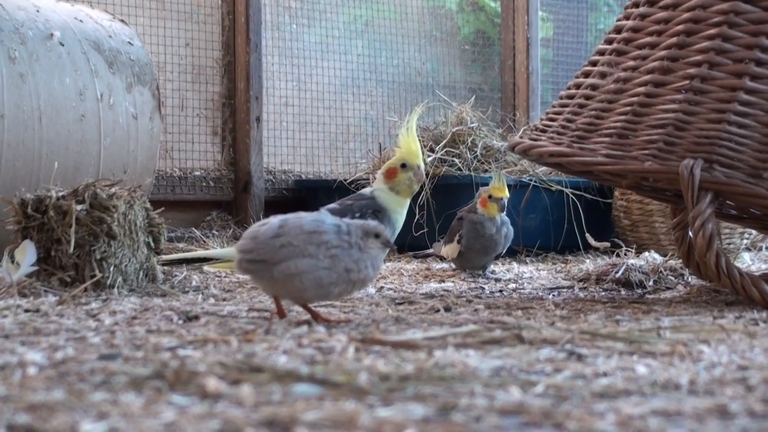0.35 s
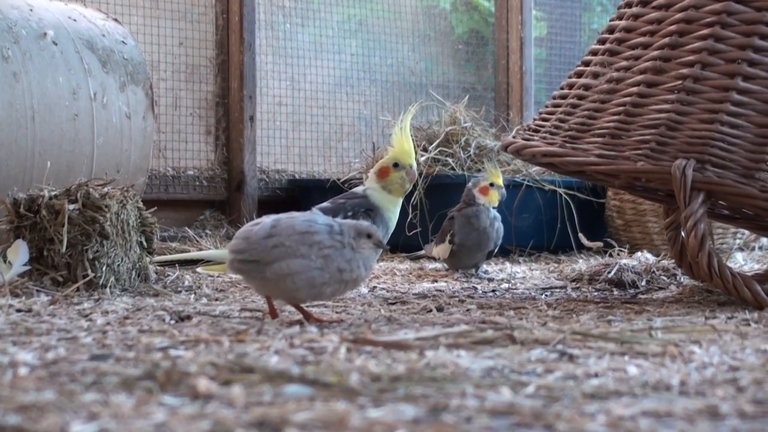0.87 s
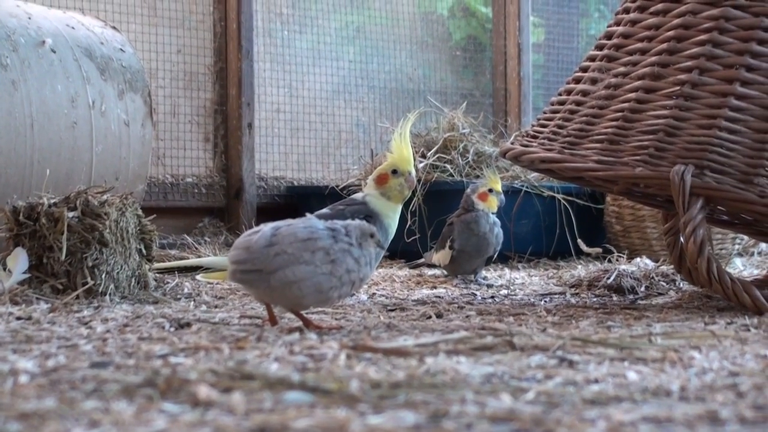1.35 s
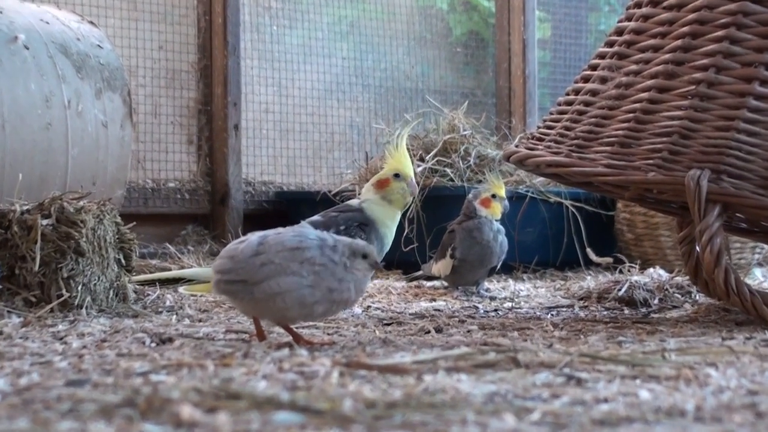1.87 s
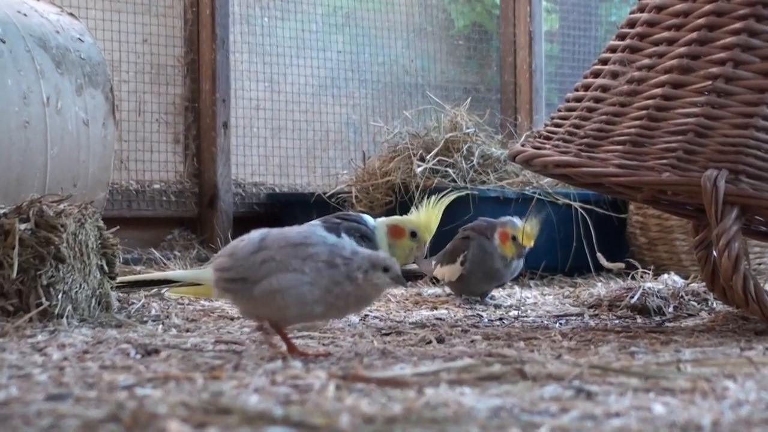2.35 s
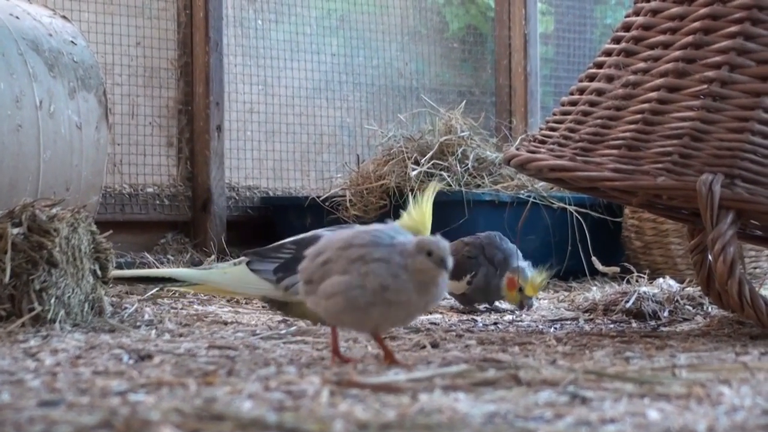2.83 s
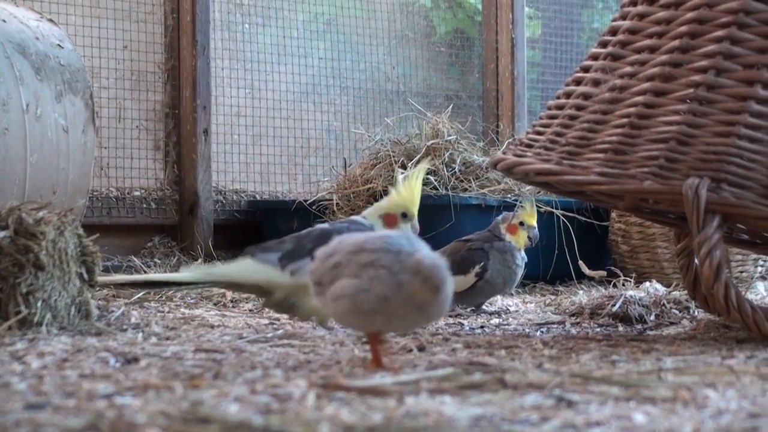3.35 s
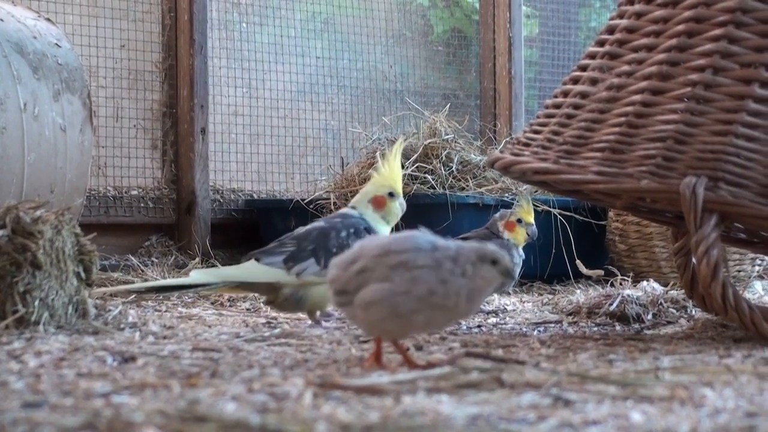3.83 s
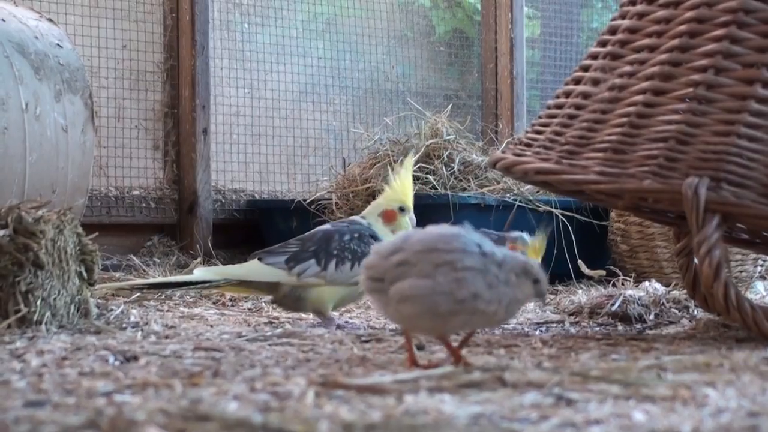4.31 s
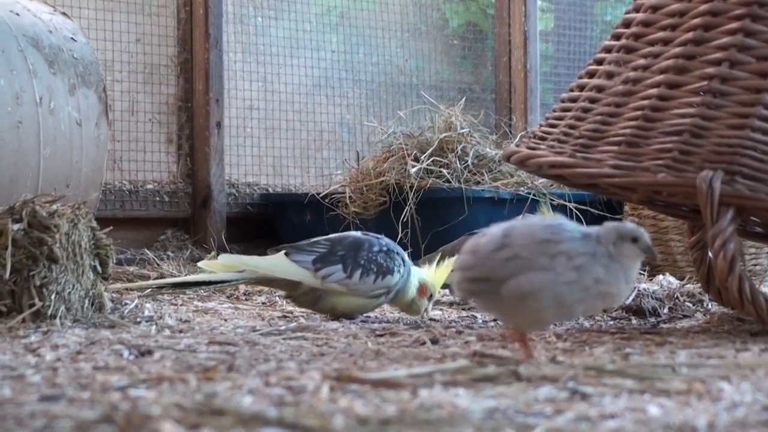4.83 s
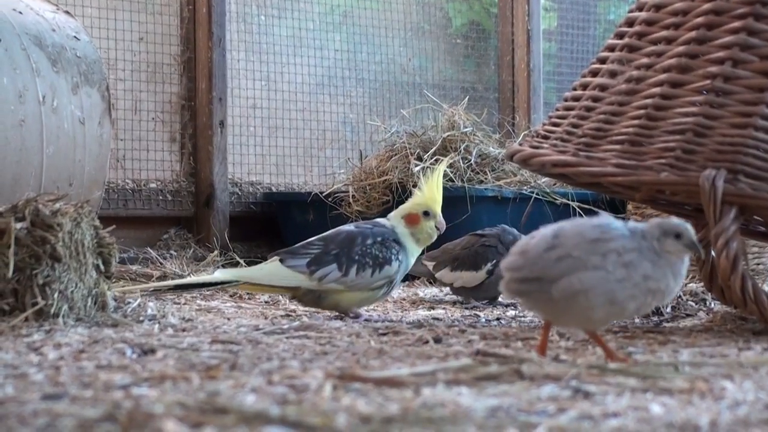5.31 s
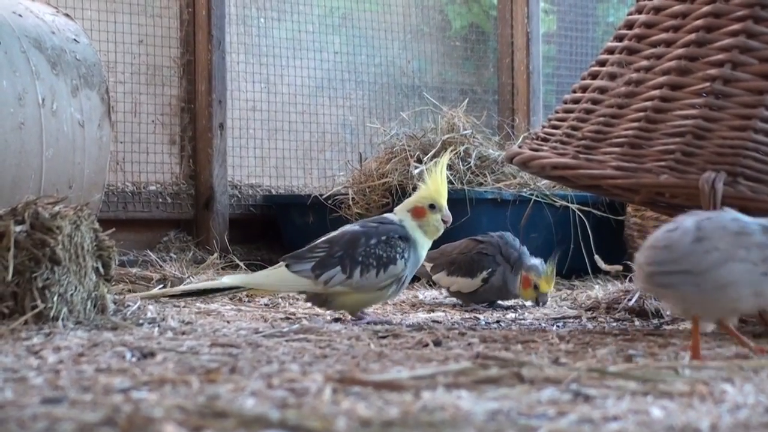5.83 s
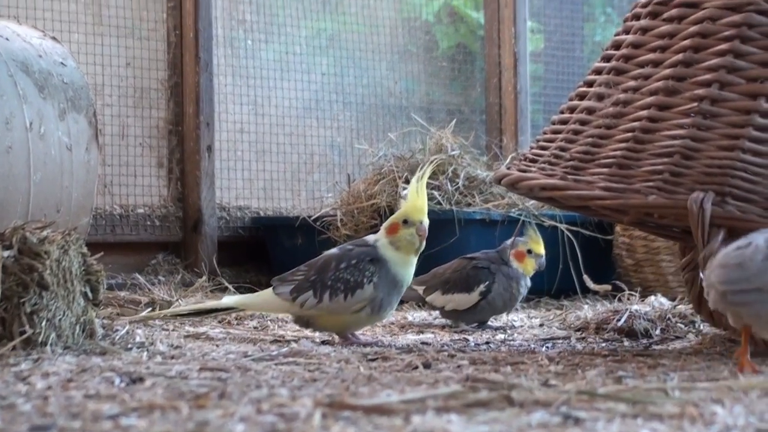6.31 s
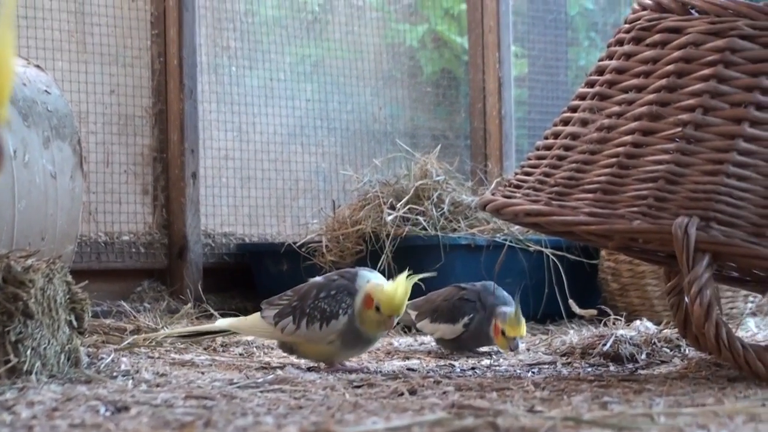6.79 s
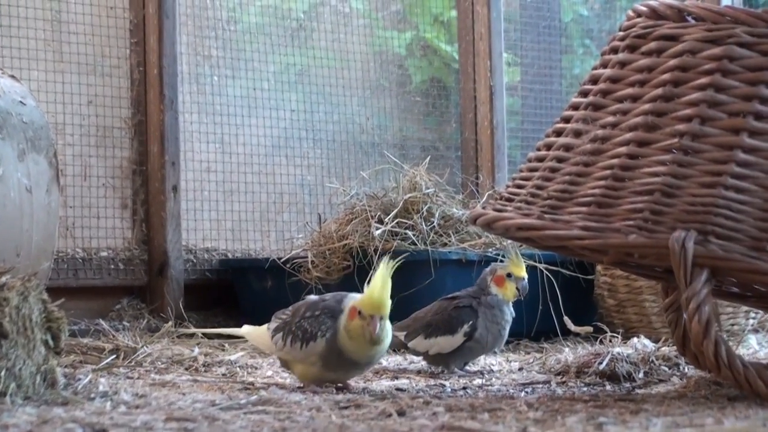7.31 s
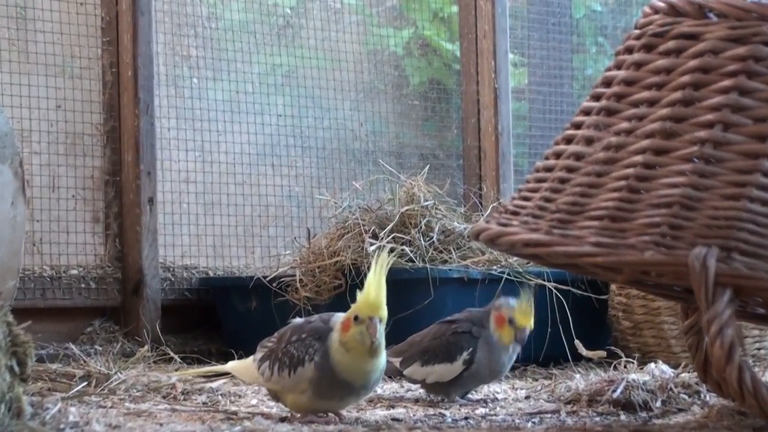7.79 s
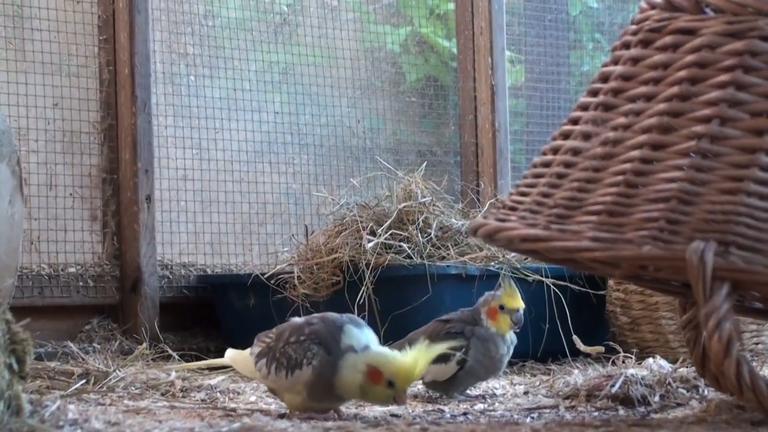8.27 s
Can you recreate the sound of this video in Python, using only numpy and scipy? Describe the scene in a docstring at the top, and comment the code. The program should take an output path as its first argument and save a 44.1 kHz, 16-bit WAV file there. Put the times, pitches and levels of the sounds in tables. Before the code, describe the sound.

Short high bird calls and harsh rasps come in quick bouts among crisp litter ticks, with faint traffic rumble, motor drone and airy hiss.

```python
"""Small parrots chatter in a timber-and-mesh aviary: whistled notes, hoarse squawks and harsh rasps.
Beaks and feet tick in the seed litter close by; distant traffic rumbles, a motor drones and air hisses.
Tonal calls are gliding harmonic stacks under a throat resonance; rasps are erratic pulses with breath noise.
Ticks are crackles ringing in husk modes; calls and ticks excite a diffuse tail. Rumble and hiss are banded
noise, and the motor is a wavering sine."""
import sys
import numpy as np
from scipy import signal
from scipy.fft import rfft, irfft
from scipy.io import wavfile

SR = 44100
rng = np.random.default_rng(int(sys.argv[2]) if len(sys.argv) > 2 else 0)


def unload_wav(signal):
    """Save mono or channel-first audio to the path in sys.argv[1] as 16-bit WAV at rate SR, clipped to [-1, 1]."""
    wavfile.write(
        sys.argv[1],
        SR,
        np.round(np.clip(np.atleast_2d(signal).T, -1, 1) * 32767).astype(np.int16),
    )


def rack_gain(trim_db):
    """Turn a fader trim in dB into the linear factor to multiply a signal by."""
    fader = np.asarray(trim_db, float)
    return 10 ** (fader / 20)


N = 370881   # samples

# transmission of throat and beak, common to every call: frequency_hz, gain_db
HEAD_GAIN = [(800, 3), (1300, 4), (4000, 1.5), (6000, 0), (7400, -2.5), (9500, -7), (11500, -6.5),
             (13000, -18), (16000, -49)]


def clear_calls():
    """Near-periodic membrane vibration: whistles, nasal notes, a long cry and caws."""
    # short clear notes, the throat tuned to the pitch: start_s, length_s, level_db, start_hz, end_hz
    whistles = [(0.355, 0.022, -29.5, 3550, 4010), (0.425, 0.025, -37, 3360, 3330),
                (0.5, 0.08, -45, 2405, 2310), (0.835, 0.028, -32, 4580, 2430),
                (1.69, 0.033, -51, 1545, 2720), (2.19, 0.02, -37.5, 1970, 1800),
                (2.207, 0.011, -19, 2880, 2840), (2.655, .012, -30, 3720, 3810),
                (2.685, 0.027, -36.5, 2080, 2350), (2.765, 0.016, -25.5, 1914, 1790),
                (4.06, 0.024, -29, 3900, 4520), (4.072, 0.04, -32, 2840, 2660),
                (4.088, 0.053, -25.5, 3580, 3530), (4.115, 0.031, -31, 2580, 2060),
                (4.16, 0.023, -33, 2280, 2090), (4.165, 0.049, -24.5, 3178, 3135),
                (4.198, 0.024, -35.5, 2020, 1690), (4.35, 0.052, -50, 3870, 3800),
                (4.72, 0.032, -50, 2500, 2250), (5.578, 0.011, -31.5, 2890, 2790),
                (7.132, 0.037, -26, 3414, 3480), (7.887, 0.033, -30, 3310, 3390),
                (7.918, 0.035, -28, 7240, 7200), (7.955, 0.026, -19, 4710, 4724)]
    # low nasal notes, the throat on a high overtone: start_s, length_s, level_db, top_pitch_hz, throat_hz
    nasal = [(1.03, 0.034, -43, 1915, 5800), (3.98, 0.033, -54, 1105, 2180), (5.091, 0.019, -39, 836, 3220),
             (5.513, 0.022, -29, 1908, 3450), (7.375, 0.057, -22.5, 1643, 4800),
             (7.41, 0.048, -29, 1194, 3640), (7.47, 0.1085, -32.5, 896.4, 4350),
             (8.12, 0.068, -22.5, 1624, 4780), (8.16, 0.043, -29.5, 1185, 4700),
             (8.235, 0.091, -31.5, 887, 4900), (8.381, 0.026, -21.5, 1814, 3750)]
    # the long clear cry: time_s, pitch_hz, level_db, overtone_fall_db_per_octave
    cry = [(5.99, 2826, -30, 25), (6.015, 3293, -50, 5), (6.04, 3810, -19, 9), (6.068, 4000, -37, 7),
           (6.078, 4256, -17, 6), (6.09, 4780, -26, 9), (6.098, 4260, -25, -1), (6.108, 3070, -15.5, 22),
           (6.122, 2823, -17.5, 3.5), (6.145, 2705, -17, 15), (6.172, 2770, -48, 12)]
    # caws whose pitch arches widely: start_s, length_s, level_db, top_pitch_hz, throat_hz
    caws = [(6.45, .095, -33, 903, 3920), (6.652, .105, -34, 901, 3550)]
    calls = notes(whistles) + [tuned(cry)]
    calls += arches(nasal, sag=.0295, fade_db=13, fall_db=26.5)
    calls += arches(caws, sag=.0786, fade_db=-.5, fall_db=20.5)   # past its top a caw holds its level
    return voice(calls, wobble=.012, wobble_hz=120, flutter_db=1.8, breathy=.3, below_db=10, edge_s=.004)


def hoarse_calls():
    """Irregular membrane vibration: stronger random frequency and amplitude modulation makes hoarseness."""
    # short hoarse notes with an unsteady pitch: start_s, length_s, level_db, start_hz, end_hz
    squawks = [(0.395, 0.031, -38, 1810, 2060), (0.46, 0.038, -40.5, 1760, 1840),
               (0.862, 0.022, -44, 2340, 2370), (1.42, 0.069, -53, 3860, 3900),
               (2.168, 0.031, -37.5, 2720, 3940), (2.295, 0.033, -29, 2610, 2282),
               (2.315, 0.028, -37, 1880, 2180), (2.72, 0.071, -30, 2590, 2340),
               (3.62, 0.083, -48.5, 1070, 1146), (3.89, 0.039, -46, 1068, 1076),
               (4.54, 0.051, -46.5, 4160, 4010), (7.2, 0.038, -24, 4590, 4470),
               (7.22, 0.029, -24.5, 6500, 6260), (7.975, .025, -24.5, 6000, 7040)]
    # hoarse nasal honks: start_s, length_s, level_db, top_pitch_hz, throat_hz
    honks = [(2.22, 0.072, -34.5, 1609, 3300), (6.09, 0.076, -33.5, 1818, 3600),
             (6.15, 0.068, -30, 1442, 2690)]
    # long hoarse cries, one curve each: time_s, pitch_hz, level_db, overtone_fall_db_per_octave
    cries = [
        [(0.422, 3190, -31, 30), (0.44, 2300, -33, 8), (0.47, 2350, -28, 19), (0.5, 2270, -67, 19)],
        [(3.21, 1312, -29, 9), (3.24, 1381, -34.5, 6), (3.27, 1420, -30.5, 16), (3.31, 1336, -34, 9),
         (3.33, 1280, -58, 9)],
        [(3.719, 1390, -31, 4), (3.73, 1364, -30, 7.5), (3.762, 1388, -25, 6), (3.785, 1534, -28.5, 6),
         (3.8, 1833, -22.5, 12), (3.82, 2090, -31, 13), (3.838, 2210, -24, 20)],
    ]
    calls = notes(squawks) + chirps() + [tuned(cry) for cry in cries]
    calls += arches(honks, sag=.0295, fade_db=13, fall_db=57)
    return voice(calls, wobble=.04, wobble_hz=180, flutter_db=2.5, breathy=.6, below_db=6, edge_s=.004)


def tuned(points):
    """Resonance tracking: the throat follows the pitch, so the fundamental is favoured."""
    return [(s, hz, db, hz, fall_db) for s, hz, db, fall_db in points]


def notes(rows):
    """Linear glide and decay in dB; overtones fall more steeply at high pitch, so high notes are purer."""
    fade_db = 5.5   # lost from start to end
    calls = []
    for s, length, db, *ends_hz in rows:
        points = []
        for share, hz in enumerate(ends_hz):   # share of the length: 0, then 1
            fall_db = 13.5 + 7 * np.log2(hz / 2000)
            points.append((s + share * length, hz, db - share * fade_db, fall_db))
        calls.append(tuned(points))
    return calls


def arches(rows, sag, fade_db, fall_db):
    """Parabolic arch of pitch under a still throat resonance; level changes by a parabola on each side."""
    top, swell_db = .36, 4   # share of the length at the top; level gained before it
    off = np.arange(-2, 3) / 2   # distance from the top, -1 at the start and 1 at the end
    share = top + off * np.where(off < 0, top, 1 - top)
    lost_db = off ** 2 * np.where(off < 0, swell_db, fade_db)
    return [np.c_[s + share * length, hz * (1 - sag * off ** 2), db - lost_db,
                  throat_hz + 0 * off, fall_db + 0 * off]
            for s, length, db, hz, throat_hz in rows]


def chirps():
    """Pitch scaling: one chirp contour, a flick up and a sag, is transposed to each chatter pitch."""
    # quick chatter chirps: start_s, top_pitch_hz, level_db
    chatter = [(5.655, 2026, -33), (5.742, 1920, -36.5), (5.813, 1870, -32.5), (5.911, 1762, -30),
               (6.268, 1752, -31.5), (6.352, 1948, -30)]
    # shape of one chirp: after_start_s, share_of_top_pitch, relative_level_db, overtone_under_throat,
    # overtone_fall_db_per_octave
    contour = [(0, 0.7, -0.5, 2, 15), (.014, 0.96, -10.5, 1.8, 15), (.024, 1, -3.5, 1, 17),
               (.05, .93, -20, 0.62, 15)]
    return [[(s + after, hz * share, db + rise_db, hz * share * overtone, fall_db)
             for after, share, rise_db, overtone, fall_db in contour] for s, hz, db in chatter]


def voice(calls, wobble, wobble_hz, flutter_db, breathy, below_db, edge_s):
    """Source and filter: a gliding harmonic stack falls away on both sides of the throat resonance."""
    out, shaky, flutter = np.zeros(N), drift(wobble_hz), drift(160)
    turbulence = drift(500)   # air rushing past the membranes
    for call in calls:
        s, *columns = np.transpose(call)
        at = np.arange(round(s[0] * SR), min(round(s[-1] * SR), N))
        hz, db, throat_hz, fall_db = (np.interp(at / SR, s, c) for c in columns)
        k = np.arange(1, 15000 // hz.min() + 1)[:, None]   # overtone number
        octaves = np.log2(k * hz / throat_hz)
        slope_db = np.where(octaves > 0, -fall_db * octaves, below_db * octaves)
        head_db = at_hz(HEAD_GAIN, k * hz) - at_hz(HEAD_GAIN, throat_hz)
        strength = rack_gain(slope_db + head_db) * (k * hz < .4 * SR)
        # higher overtones are breathier
        strength = strength * (1 + breathy * np.clip(k * hz / 3000 - .4, 0, 1.2) * turbulence[at])
        wobble_share = np.minimum(hz / 2500, 2500 / hz)   # the lowest and highest notes wobble least
        turns = np.cumsum(hz * (1 + wobble * wobble_share * shaky[at])) / SR
        stack = np.sum(strength * np.sin(k * 2 * np.pi * turns + k * k), axis=0)
        breath = np.clip(np.minimum(at / SR - s[0], s[-1] - at / SR) / edge_s, 0, 1)
        out[at] += rack_gain(db + flutter_db * flutter[at]) * breath * stack
    return out


def rasps(jitter, hiss, swell, fade_db):
    """Aperiodic phonation: erratic membrane pulses and breath noise, coloured by the open beak."""
    # broad harsh rasps: start_s, length_s, level_db, centre_hz, mean_pulse_rate_hz
    broad = [(0.388, 0.05, -47, 2880, 2290), (0.842, 0.03, -41.5, 3600, 1208),
             (0.901, 0.041, -43, 2500, 2255), (1.021, 0.047, -40.5, 5700, 1338),
             (1.416, 0.074, -47, 2500, 1440), (1.761, 0.032, -39, 3570, 1572),
             (2.124, .025, -52, 6270, 1885), (2.206, 0.078, -37, 3460, 1449),
             (2.307, 0.0084, -37, 3080, 2240), (2.683, 0.09, -53, 3500, 2200),
             (2.873, 0.041, -23.5, 3700, 2018), (3.143, 0.036, -22.5, 4770, 2807),
             (3.232, .091, -47.5, 6600, 1440), (3.464, 0.1, -52, 3620, 1990), (4.1, 0.075, -41, 3470, 2020),
             (5.09, 0.021, -34.5, 3820, 1564), (5.148, 0.02, -39, 3000, 1443),
             (5.229, 0.02, -37, 3540, 1462), (5.279, 0.029, -40, 3250, 1455),
             (5.365, 0.036, -29.5, 3220, 1495), (5.424, 0.025, -39, 3030, 1410),
             (5.512, 0.035, -40, 3600, 1914), (5.576, 0.022, -38, 3120, 1427),
             (5.648, 0.039, -41.5, 2940, 1462), (5.741, 0.022, -44, 3040, 1850),
             (5.902, 0.06, -40, 3000, 1756), (5.986, 0.032, -35.5, 3000, 1528),
             (6.019, 0.041, -35, 4870, 1803), (6.078, 0.095, -34.5, 3570, 1400),
             (6.271, 0.032, -37.5, 3270, 1650), (6.355, 0.028, -32, 3320, 1800),
             (6.632, 0.081, -38, 3100, 1750), (6.792, 0.032, -29, 3870, 1873),
             (6.859, 0.048, -35.5, 3620, 1930), (6.913, 0.083, -36, 3500, 1287),
             (7.026, .03, -42.5, 4650, 2060), (7.043, .044, -41, 3320, 1520),
             (7.315, .058, -20, 4950, 1474), (7.362, 0.11, -32, 4200, 1588),
             (7.665, 0.09, -35.7, 3380, 1543), (7.777, 0.094, -43, 3600, 2040),
             (7.878, 0.19, -47.5, 3530, 1720), (8.097, 0.11, -32.5, 3950, 1569),
             (8.369, 0.05, -35, 4600, 1840)]
    # thin wheezes through a nearly closed beak: start_s, length_s, level_db, centre_hz, spread_octaves
    wheezes = [(0.113, .11, -54, 2600, 0.11), (0.446, 0.031, -43, 7200, 0.065),
               (1.12, .059, -59, 9000, 0.43), (2.027, .032, -62, 6500, .35),
               (2.225, 0.031, -40, 6360, 0.022), (2.293, 0.023, -39, 7800, 0.059),
               (2.551, 0.022, -41.5, 10200, 0.28), (2.81, 0.071, -52, 7200, 0.29),
               (3.018, 0.045, -50.5, 7200, 0.11), (4.069, 0.015, -34, 4000, 0.32),
               (4.484, 0.11, -55.5, 4750, 0.34), (4.647, 0.046, -51, 7000, 0.11),
               (4.857, 0.043, -49, 7140, 0.12), (5.813, 0.031, -45.5, 2490, 0.18),
               (6.526, 0.055, -34.5, 2860, .37), (7.124, 0.14, -42.5, 3370, 0.33),
               (7.16, 0.043, -32.5, 7200, .071), (7.205, 0.042, -41, 3420, 0.42),
               (7.219, 0.019, -30, 6000, 0.073), (7.951, 0.068, -39, 3150, 0.33),
               (7.983, 0.016, -33, 6370, 0.28), (8.145, 0.11, -30.5, 4060, 0.31)]
    shaky, noise, out = drift(265), rng.standard_normal(N), np.zeros(N)
    # a rasp narrows by 0.007 octave for each dB louder
    rows = [(s, length, db, hz, .64 - .007 * (db + 40), pulse_hz) for s, length, db, hz, pulse_hz in broad]
    rows += [(*row, 1800) for row in wheezes]   # pulse rate, Hz
    for s, length, db, centre_hz, spread, pulse_hz in rows:
        at = np.arange(round(s * SR), min(round((s + 3 * length) * SR), N))   # leaves room for the fade
        turns = np.cumsum(pulse_hz * np.exp(jitter * shaky[at])) / SR
        pulses = sum(np.sin(k * 2 * np.pi * turns) for k in range(1, 8))
        source = rms_one(pulses) + hiss * noise[at]
        hz = np.fft.rfftfreq(len(at), 1 / SR) + 1
        colour = np.exp(-(np.log2(hz / centre_hz) / (2 * spread)) ** 2)
        colour = colour * rack_gain(at_hz(HEAD_GAIN, hz)) / (1 + (1100 / hz) ** 8)   # little below 1100 Hz
        t = (at - at[0]) / SR / length   # in lengths
        breath = np.clip(t / swell, 0, 1) * rack_gain(-fade_db * np.maximum(t - .6, 0))
        out[at] += rack_gain(db) * breath * rms_one(irfft(rfft(source) * colour, len(at)))
    return out


def ticks(faint_per_s, faint_db, t60):
    """Modal excitation: a decaying crackle rings husk resonances; fainter ticks fall at random."""
    # seeds cracked and litter stepped on: start_s, peak_db, dullness_db_per_octave
    strikes = [(0.0149, -41, -17), (0.157, -36, 1), (0.2018, -31.5, 9), (0.2455, -39.5, -17),
               (0.3812, -27, 4), (0.6164, -40, -17), (0.6449, -40, 12), (0.686, -37, -16),
               (0.7467, -60, -14), (0.7787, -31.5, -1), (0.911, -30, 31), (1.344, -43, -4),
               (1.508, -35, -5), (1.7304, -37, 6), (2.0258, -43, -13), (2.1205, -31.5, -12),
               (2.5435, -40, -19), (2.6369, -43, 2), (2.6569, -33.5, -2), (3.3976, -40.5, -13),
               (3.4999, -29.5, -2), (3.9437, -38, -2), (3.9854, -33, 19), (4.2854, -46, -9),
               (4.3087, -39, -20), (4.3944, -35, -11), (4.5962, -37, 20), (4.668, -53, -16),
               (4.7686, -44, -8), (4.781, -27.5, 3.5), (4.842, -39, -18), (5.008, -40, -20),
               (5.1785, -29.5, 8), (5.2094, -29.5, -2), (6.4964, -26, 24), (7.017, -29.5, -7),
               (7.628, -34, -8)]
    # resonances of a husk: frequency_hz, width_hz, level_db
    husk = [(2200, 890, 18.5), (4700, 1400, 11.5), (7200, 1300, 6.5), (11300, 12000, -34.5)]
    count = int(faint_per_s * N / SR)
    chance = rng.random((count, 3))
    faint = np.c_[chance[:, 0] * N / SR, faint_db + 9 * chance[:, 1], -12 * chance[:, 2]]
    out, t = np.zeros(N), np.arange(600) / SR
    for s, db, dull_db in [*strikes, *faint]:
        crackle = rng.standard_normal(len(t)) * rack_gain(-60 * t / t60)
        tick = 0
        for hz, width, mode_db in husk:
            r = np.exp(-np.pi * width / SR)   # pole radius
            poles = [1, -2 * r * np.cos(2 * np.pi * hz / SR), r * r]
            ringing = signal.lfilter([1, 0, -1], poles, crackle)
            tick = tick + (1 - r * r) * rack_gain(mode_db - dull_db * np.log2(hz / 4000)) * ringing
        add(out, s, rack_gain(db) * tick / np.abs(tick).max())
    return out


def aviary(x, wet_db, mid_share):
    """Diffuse reverberation: the direct sound plus a tail that dies sooner in the treble."""
    # decay time: frequency_hz, t60_s
    decay = [(1000, .3), (3000, .24), (6000, .19), (12000, .14)]
    t = np.arange(SR // 2) / SR
    white = rng.standard_normal((2, len(t)))
    mid, side = sum(signal.sosfilt(sos, white) * rack_gain(-60 * t / at_hz(decay, hz))
                    for hz, sos in bands(703.7, count=9))
    onset = np.clip((t - .002) / .002, 0, 1)
    tail = onset * (np.sqrt(mid_share) * mid + np.sqrt(1 - mid_share) * side * [[1], [-1]])
    tail *= rack_gain(wet_db) / np.sqrt(np.sum(tail ** 2) / 2)
    return x + signal.fftconvolve(x[None], tail, axes=1)[:, :N]


def air(patchy_db):
    """Partly correlated noise: rumble and hiss in half-octave bands, sharing three slow to quick flickers."""
    # spectrum before the overall level is set: frequency_hz, relative_level_db_per_hz
    spectrum = [(12, -35), (20, -3), (60, -2), (123, -1.5), (216, -2), (660, -12.5), (897, -11),
                (1570, -16.5), (2140, -22), (2320, -20.5), (3740, -28), (7110, -29.5), (16000, -39)]
    # overall rms level: time_s, level_db
    loudness = [(0.0, -42.5), (1.4, -44.5), (1.7, -45.5), (4.12, -44), (4.85, -46), (6.0, -45),
                (8.41, -42.5)]
    # correlation of left and right: frequency_hz, likeness
    likeness = [(30, 1.0), (125, 0.98), (250, 0.96), (500, 0.35), (1000, 0.45), (4000, 0.42), (12000, 0.62)]
    # balance: frequency_hz, left_minus_right_db
    balance = [(60, 0), (240, -1.5), (950, -1.5), (3770, 0.5), (15000, -0.5)]
    out, white = 0, rng.standard_normal((2, 2, N))
    flicker = [drift(2.3), drift(4.2), drift(45)]
    for k, (hz, sos) in enumerate(bands(17.3, count=20)):
        mid, side = signal.sosfilt(sos, white[k % 2])
        alike = np.clip(at_hz(likeness, hz), 0, 1)
        stereo = np.sqrt(1 + alike) * mid + np.sqrt(1 - alike) * side * [[1], [-1]]
        gain = rack_gain(at_hz(spectrum, hz) + patchy_db * flicker[k % 3])
        out = out + gain * rack_gain(at_hz(balance, hz) * np.array([[.5], [-.5]])) * stereo
    return rms_one(out) * rack_gain(in_time(loudness)[0])


def engine():
    """Randomly modulated sine: a far-off motor drones with wavering pitch and level."""
    # distant drone: time_s, pitch_hz, rms_level_db
    drone = [(0.0, 74.2, -54.5), (2.06, 76.24, -51.5), (2.74, 107, -55), (3.79, 127.3, -51),
             (4.64, 130.6, -63), (4.85, 119.6, -65), (6.98, 119.9, -58.5), (8.41, 119, -56)]
    hz, db = in_time(drone)
    turns = np.cumsum(hz * (1 + .03244 * drift(3.49))) / SR
    return rack_gain(db + 1.53 * drift(3.9)) * np.sqrt(2) * np.sin(2 * np.pi * turns)


def rms_one(x):
    """Power normalisation: scale to unit rms."""
    return x / np.sqrt(np.mean(x ** 2) + 1e-20)


def in_time(rows):
    """Linear interpolation: the columns of a curve at every sample."""
    s, *columns = np.transpose(rows)
    return [np.interp(np.arange(N) / SR, s, c) for c in columns]


def at_hz(points, hz):
    """Logarithmic frequency scale: interpolate a table along octaves."""
    return np.interp(np.log(hz), np.log(np.array(points)[:, 0]), np.array(points)[:, 1])


def drift(rate_hz):
    """Low-passed chance: noise twice through a one-pole filter, scaled to unit rms."""
    r = np.exp(-2 * np.pi * rate_hz / SR)
    noise = rng.standard_normal(N + SR)   # the first second lets the filter settle
    return rms_one(signal.lfilter([1], [1, -2 * r, r * r], noise)[SR:])


def add(out, s, sound):
    """Superposition: mix a sound in at time s."""
    i = max(round(s * SR), 0)
    out[i:i + len(sound)] += sound[:N - i]


def bands(low_hz, count):
    """Constant relative bandwidth: half-octave band-passes with their centres."""
    edges = low_hz * 2 ** (np.arange(count + 1) / 2)
    return [(np.sqrt(a * b), signal.butter(2, [a, min(b, .45 * SR)], "band", fs=SR, output="sos"))
            for a, b in zip(edges, edges[1:])]


def scene():
    """Superposition of birds and litter, each with its reverberation, over the outdoor background."""
    harsh = rasps(jitter=.07, hiss=.65, swell=.17, fade_db=30)
    calls = aviary(clear_calls() + hoarse_calls() + harsh, wet_db=-1, mid_share=.79)
    litter = aviary(ticks(faint_per_s=14, faint_db=-59, t60=.03), wet_db=-1, mid_share=.6)
    return calls * rack_gain([[-.3], [.3]]) + litter + air(patchy_db=1.86) + engine()


def low_pass(x):
    """Removes everything above the highest recorded frequency."""
    return signal.sosfilt(signal.butter(12, 15900, fs=SR, output="sos"), x)


def record(dry):
    """Band limitation: the finished mix loses its top treble and some fine spectral detail."""
    return low_pass(dry)


dry = scene()
out = record(dry)
unload_wav(out)
```